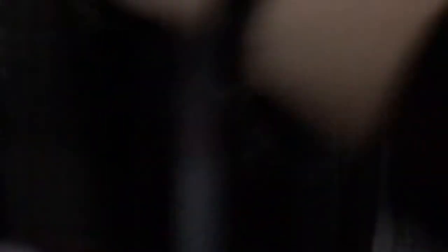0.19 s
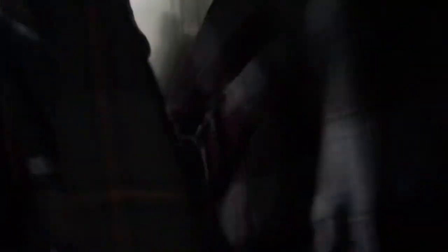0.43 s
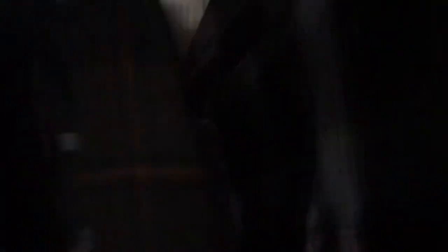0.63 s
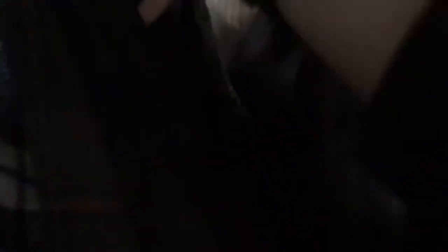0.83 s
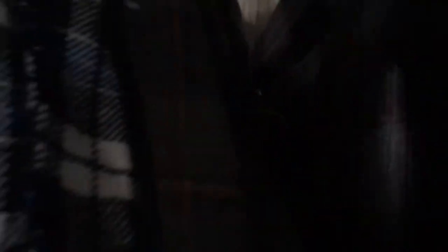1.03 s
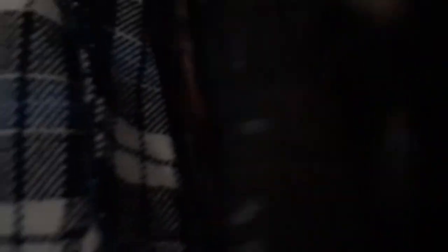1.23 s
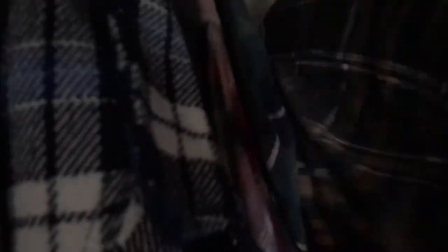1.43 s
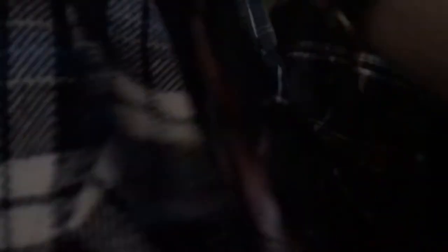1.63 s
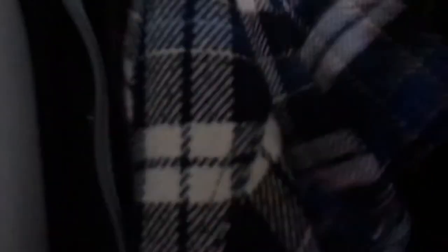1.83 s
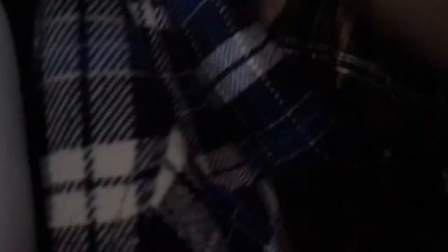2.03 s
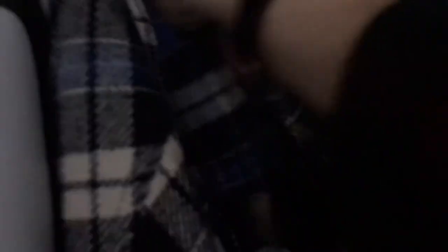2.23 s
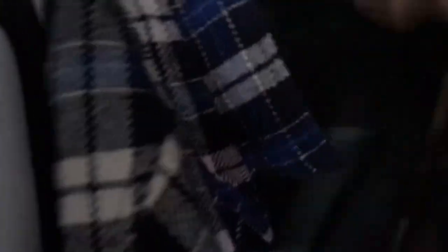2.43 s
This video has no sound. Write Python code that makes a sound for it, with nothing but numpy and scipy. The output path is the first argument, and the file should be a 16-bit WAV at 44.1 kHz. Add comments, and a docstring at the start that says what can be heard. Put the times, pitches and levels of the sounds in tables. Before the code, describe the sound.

Clothes hangers scrape along a closet rail and click together three times, with soft shirt rustle.

```python
"""Hangers pushed along a closet rail, close to a handheld microphone. Their steel hooks scrape on the
rail in three stick-slip strokes, then hooks and plastic bodies clash in bursts of tiny bright clicks.
Hangers knock on wood; shirts rustle and bump softly against the microphone. The cloth-damped closet
gives the hangers a very short tail, and a quiet room hisses and rumbles underneath."""
import sys
import numpy as np
from scipy import signal
from scipy.fft import rfft, irfft, next_fast_len
from scipy.io import wavfile
from scipy.ndimage import map_coordinates

SR = 44100
rng = np.random.default_rng(int(sys.argv[2]) if len(sys.argv) > 2 else 0)


def dump(signal):
    """Clip the signal to [-1, 1] and save it as 16-bit WAV at the path in sys.argv[1]."""
    limited = np.clip(np.atleast_2d(signal).T, -1, 1)
    pcm = np.round(limited * 32767).astype(np.int16)
    wavfile.write(sys.argv[1], SR, pcm)


N = 112455


def hanger_clicks():
    """Hangers clash close up: hook and body ring for milliseconds, then a loose, bright chatter dies."""
    # contacts between hangers: start_s, hook_db, body_db
    contacts = [(0.1863, -44.5, -34), (0.207, -32.5, -56), (0.225, -45, -23.5), (0.229, -2, -24),
                (0.2294, -2, -51), (0.2309, -6.5, -13.5), (0.2328, -4.5, -38), (0.2385, 0, -35),
                (0.2408, -24, -41), (0.2443, -25.5, -49), (0.246, -12, -37), (0.254, -14.5, -28),
                (0.2712, -15, -23.5), (0.2749, -33, -48), (0.29, -21, -25), (0.298, -20, -22.5),
                (0.3002, -52, -26), (0.3115, -25.5, -34), (0.3137, -41, -32.5), (0.3984, -71.5, -49),
                (0.513, -50, -69), (0.6195, -67, -38), (0.6225, -83.5, -45), (0.6547, -55.5, -52),
                (1.2928, -4.5, -28.5), (1.2948, -21, -34), (1.2944, -6.5, -42), (1.2984, -5.5, -20.5),
                (1.301, -19, -48), (1.309, -32, -23), (1.3192, -27, -36), (1.3498, -30, -38),
                (1.3543, -22, -32.5), (1.3565, -35, -40), (1.3668, -32, -37.5), (1.3975, -63, -38),
                (1.4134, -52, -45), (1.5371, -43.5, -61), (1.565, -55.5, -48), (1.6119, -57, -42),
                (1.624, -61, -55), (1.6486, -61.5, -38.5), (1.8103, -68.5, -49.5), (2.2106, -22, -31.5),
                (2.212, -30, -50.5), (2.2151, -40.5, -56), (2.2505, -42, -33), (2.2523, -50, -33),
                (2.2585, -12, -27), (2.2606, -16, -36), (2.2642, -32, -59), (2.267, -27, -63),
                (2.32, -30, -50), (2.32, -30, -39), (2.3253, -15.5, -27.5), (2.3259, -16.5, -43),
                (2.331, -30, -55), (2.363, -35, -69), (2.3692, -15, -40), (2.3701, -16.5, -27),
                (2.3747, -41, -64), (2.3776, -36, -63), (2.4339, -40, -30), (2.436, -52, -35),
                (2.4578, -55, -42), (2.4842, -69, -49), (2.5315, -64, -40)]
    # modes of the steel hook and of the plastic body: pitch_hz, level_db, t60_s
    hook_modes = [(5800, -8, 0.0016), (8800, -10, 0.0045), (9480, -6.5, 0.0041), (11270, -4.5, 0.0035),
                  (13190, -7.5, .004), (14230, -6, 0.0086), (15950, -5.5, 0.0041)]
    body_modes = [(1900, -2, 0.003), (2500, -8, 0.0073), (3366, -4.5, 0.0074), (3886, -5.5, 0.0082),
                  (4350, 0, 0.0021), (5656, 1, 0.0034), (6890, -2.5, 0.006)]
    # as different hangers meet, different body modes ring most: start_s, favoured_hz, boost_db
    partners = [(0, 2500, 12), (.228, 7000, 8), (.25, 5700, 6), (.295, 2500, 4), (1, 7000, 9),
                (1.34, 2500, 8), (1.39, 3900, 4), (1.6, 1900, 6), (2.2, 7000, 4), (2.24, 3400, 13),
                (2.255, 3900, 14), (2.43, 7000, 3), (2.45, 3400, 5)]
    start_s, hook_db, body_db = np.transpose(contacts)
    hooks = struck(start_s, hook_db - 4, hook_modes, attack_s=.00008, detune=.03, scatter_db=3.5)
    change_s, favoured_hz, boost_db = np.transpose(partners)
    partner = np.searchsorted(change_s, start_s) - 1
    away_oct = np.log2(np.transpose(body_modes)[0] / favoured_hz[partner, None])
    bodies = struck(start_s, body_db - 4.5, body_modes, attack_s=.00016, detune=.025, scatter_db=3,
                    colour_db=boost_db[partner, None] * np.exp(-(away_oct / .12) ** 2))
    chatter_db, chatter_t60_s = -22, .032
    blow_power = np.zeros(N)
    blow_power[np.round(start_s * SR).astype(int)] = amp(2 * hook_db)
    chatter_power = signal.lfilter([1], [1, -amp(-120 / (chatter_t60_s * SR))], blow_power)
    # chatter spectrum: frequency_hz, level_db
    bright = [(1500, -19.5), (5000, -11), (9000, 1), (15800, -4.5), (16200, -30)]
    chatter = coloured(grains(per_s=9100, spread_db=4), bright)
    return hooks + bodies + amp(chatter_db) * np.sqrt(chatter_power) * chatter


def hook_scrapes():
    """Hooks slide on the rail; each stroke has its own hook and place, and so its own resonances."""
    # one table a stroke: time_s, level_db, treble_offset_db
    strokes = [
        [(.165, -69.5, 7.5), (.19, -44, -12), (.204, -62.5, -8), (.208, -45.5, 6.5), (.228, -43, 0.5),
         (.25, -42.5, -3.5), (.262, -61, -6.5), (.3, -63.5, -1.5), (.315, -64, -4)],
        [(1.185, -73.5, -10), (1.2, -63.5, -4.5), (1.22, -55, -5.5), (1.245, -46, -1.5), (1.275, -42.5, -5),
         (1.292, -42, -6)],
        [(2.235, -65.5, 0), (2.255, -49, -2), (2.29, -48.5, -1), (2.34, -56, -2.5), (2.385, -59.5, 4),
         (2.43, -76, 5)],
    ]
    # lower and upper resonances of the rail: pitch_hz, width_hz, level_db
    rail_low = [(750, 320, -8), (1120, 280, 1), (2500, 300, 0), (3000, 680, -1.5), (4080, 640, -3),
                (5170, 510, -3), (6440, 470, -3)]
    rail_high = [(8560, 1300, -6), (13000, 2800, -10)]
    # one row a stroke: low singing resonance and whistle (pitch_hz, width_hz, level_db each), dull_hz
    voices = [((1900, 250, -0.5), (10250, 210, 4.8), 4900), ((1580, 166, 6.4), (10450, 500, 3.7), 15000),
              ((1720, 320, 0.67), (11500, 670, -6), 2900)]
    out = np.zeros(N)
    for stroke, (sing, whistle, dull_hz) in zip(strokes, voices):
        level_db, treble_db = level_curves(stroke)
        low = amp(level_db) * stick_slip(rail_low + [sing], dull_hz)
        high = amp(level_db + treble_db - 2.5) * stick_slip(rail_high + [whistle])
        out += low + high
    return out


def stick_slip(resonances, dull_hz=np.inf):
    """Tiny fast slips ring rail and hook, juddering as the grip comes and goes; rms 1."""
    def response(hz):
        bands = sum((-1) ** k * amp(db) * 1j * hz * width / (pitch ** 2 - hz ** 2 + 1j * hz * width)
                    for k, (pitch, width, db) in enumerate(sorted(resonances)))
        return bands / (1 + 1j * hz / dull_hz) ** 2
    judder_per_s, judder_db = 170, 2.5
    judder = map_coordinates(rng.standard_normal(N), [np.arange(N) * judder_per_s / SR])
    slips = amp(judder_db * judder) * grains(per_s=7000, spread_db=.74)
    return unit(filtered(slips, response))


def wood_knocks():
    """Hangers knock dully on wood; the place of the blow favours some modes, broad blows die sooner."""
    # blows, with the modes struck hardest and how far the others reach: start_s, level_db, centre_hz,
    # reach_octaves
    blows = [(.21,-40.5,595,0.27),(0.247,-34,266,1.2),(0.315,-22.5,560,0.94),(.397,-44,1276,1.2),(0.457,-43,210,0.48),(.618,-42.5,495,2),(.633,-42.5,283,0.85),(0.652,-44.5,497,1.05),(1.195,-48,1160,1.4),(1.295,-40.5,330,0.7),(1.364,-29.5,366,0.8),(1.368,-38,1700,1.4),(1.501,-44.5,226,0.71),(1.521,-42,500,1.37),(1.619,-43,796,1.4),(1.651,-40.5,268,0.39),(1.808,-54,500,2.3),(1.975,-43.5,1210,1.5),(1.995,-51,295,0.29),(1.997,-45.5,850,1.1),(2.01,-46.5,1700,1.2),(2.272,-38.5,567,0.11),(2.287,-41,580,0.14),(2.385,-44.5,444,0.73),(2.405,-41.5,435,0.84),(2.504,-47,313,1.27)]
    # modes of the wood, before each blow's damping: pitch_hz, level_db, t60_s
    wood_modes = [(211, -1, 0.099), (267, -2.5, 0.094), (363, 0.5, 0.063), (459, -6.5, .08),
                  (598.3, -5, 0.1), (720, 2.5, 0.041), (979, -2.5, .03), (1093, -1.5, 0.046),
                  (1500, 5, 0.022), (2100, 0.5, 0.031)]
    start_s, level_db, centre_hz, reach_oct = np.transpose(blows)
    away = np.log2(np.transpose(wood_modes)[0] / centre_hz[:, None]) / reach_oct[:, None]
    return struck(start_s, level_db - 1, wood_modes, attack_s=.0003, detune=.029, scatter_db=2,
                  colour_db=-10 * away ** 2, damping=.77 + .5 * (reach_oct / .95) ** 2)


def microphone_thumps():
    """Cloth bumps the microphone itself: each soft push swings out in a few low cycles."""
    # pushes: start_s, level_db, pitch_hz
    pushes = [(0.243, -35.5, 133), (0.322, -28, 89.5), (0.374, -39, 76.7), (0.67, -38, 127),
              (1.208, -44, 59.5), (1.293, -34, 61), (1.37, -32.5, 84), (1.408, -37.5, 66), (1.533, -34, 92),
              (1.559, -36, 103), (2.255, -40, 71), (2.308, -40, 96.9), (2.331, -37.5, 80)]
    t60_cycles, rise_s = 5.76, .002
    out, t = np.zeros(N + SR), np.arange(SR // 4) / SR
    for start_s, level_db, hz in pushes:
        envelope = amp(level_db + 6.5 - 60 * t * hz / t60_cycles) * (1 - np.exp(-t / rise_s))
        out[round(start_s * SR):][:len(t)] += envelope * np.sin(2 * np.pi * hz * t)
    return out[:N]


def cloth_rumble():
    """Cloth pressing on the microphone makes low, noisy thuds with a hollow rumble."""
    # pressure of the cloth: time_s, level_db
    bumps = [(0, -73.5), (.16, -63), (.25, -39), (.3, -52.5), (.33, -38), (.4, -55), (.58, -59.5),
             (.65, -49.5), (.75, -65.5), (1.17, -69), (1.31, -45.5), (1.44, -55), (1.65, -54.5),
             (1.76, -64), (2.21, -66), (2.28, -41), (2.42, -54.5), (2.55, -63.5)]
    # spectra of the thud and the hollow rumble: frequency_hz, level_db
    thud_spectrum = [(12, -40), (20, -11.5), (81, -3.5), (130, -3.5), (204, -16.5), (300, -10.5),
                     (390, -26), (660, -120)]
    hollow_spectrum = [(88, -30.5), (150, 5.5), (292, -14), (357, -6), (551, -8.5), (1500, -25.5),
                       (1950, -43.5), (3300, -120)]
    level_db, = level_curves(bumps)
    thud = coloured(rng.standard_normal(N), thud_spectrum)
    hollow = coloured(rng.standard_normal(N), hollow_spectrum)
    return amp(level_db) * (thud + amp(-7) * hollow)


def shirt_rustle():
    """Shirts rub near the microphone: their fibres make a coarse rustle and a fine swish."""
    # rubbing: time_s, coarse_db, fine_db
    rubbing = [(0, -84.5, -84), (.3, -57.5, -64), (.33, -55, -62), (.38, -68, -76.5), (.44, -100, -91.5),
               (.5, -71.5, -69), (.56, -80, -76), (.64, -73, -88), (.67, -72, -63), (.71, -77, -76.5),
               (.88, -73.5, -75.5), (.94, -69.5, -69.5), (1.06, -74, -64), (1.12, -70, -67),
               (1.2, -67.5, -67), (1.33, -68.5, -56.5), (1.36, -54.5, -58), (1.43, -61.5, -69),
               (1.47, -79, -91.5), (1.52, -74, -74), (1.54, -65, -62), (1.59, -72, -74),
               (1.62, -54.5, -68.5), (1.66, -64, -62.5), (1.7, -75, -71.5), (1.73, -66, -65),
               (1.75, -72, -84), (1.88, -82, -82.5), (1.91, -82.5, -66.5), (2.0, -64.5, -70),
               (2.04, -77, -77), (2.2, -76, -73.5), (2.4, -67.5, -77.5), (2.46, -69.5, -83),
               (2.55, -75, -82)]
    # spectra of the rustle and the swish: frequency_hz, level_db
    coarse_spectrum = [(500, -34), (900, 4), (2500, 0.5), (5000, -3.5), (9000, -9.5), (16000, -35)]
    fine_spectrum = [(2000, -39.5), (5000, -10.5), (8500, -7.5), (11000, -7), (13000, -3), (15800, -8),
                     (16100, -23)]
    return sum(amp(level_db) * coloured(grains(per_s=11000, spread_db=2.5), spectrum)
               for level_db, spectrum in zip(level_curves(rubbing), (coarse_spectrum, fine_spectrum)))


def closet_reverb(x):
    """The short, dull answer of a closet damped by clothes."""
    t60_s, dull_hz, delay_samples = .0554, 7150, 90
    t = np.arange(SR // 5) / SR
    tail = rng.standard_normal(len(t)) * amp(-60 * t / t60_s)
    wet = signal.fftconvolve(np.pad(x, (delay_samples, 0)), tail / np.linalg.norm(tail))[:N]
    return filtered(wet, lambda hz: 1 / (1 + 1j * hz / dull_hz))


def room_tone():
    """The quiet room behind: steady rumble and hiss, with one faint, narrow, high band."""
    # rumble and hiss: frequency_hz, level_db
    spectrum = [(12, -42), (20, 6), (74, 2.5), (247, -14), (301, -18), (497, -19), (1440, -24),
                (1610, -27.5), (4040, -28), (15900, -35)]
    band_hz, width_hz = 12800, 250
    band = filtered(rng.standard_normal(N), lambda hz: np.exp(-((hz - band_hz) / width_hz) ** 2))
    return amp(-60) * coloured(rng.standard_normal(N), spectrum) + amp(-85) * unit(band)


def struck(starts_s, peaks_db, modes, attack_s, detune, scatter_db, colour_db=0, damping=1):
    """Every blow rings the modes anew, each a little off in pitch and level."""
    hz, db, t60_s = np.transpose(modes)
    out = np.zeros(N + SR)
    t = np.arange(int(2 * SR * min(t60_s.max(), .1)))[:, None] / SR
    level_draw, pitch_draw, phase_draw = rng.standard_normal((len(starts_s), 3, len(hz))).swapaxes(0, 1)
    levels_db = db + colour_db + scatter_db * level_draw
    pitches_hz = hz * (1 + detune * pitch_draw)
    damping = damping * np.ones(len(starts_s))
    attack = (1 - np.exp(-t / attack_s)) ** 2
    for i, start_s in enumerate(starts_s):
        envelopes = attack * amp(levels_db[i] - 60 * damping[i] * t / t60_s)
        ring = (envelopes * np.sin(2 * np.pi * pitches_hz[i] * t + np.pi * phase_draw[i])).sum(1)
        out[round(start_s * SR):][:len(t)] += amp(peaks_db[i]) * ring / abs(ring).max()
    return out[:N]


def grains(per_s, spread_db):
    """Tiny random impulses of scattered size."""
    hit = rng.random(N) < per_s / SR
    return hit * rng.standard_normal(N) * amp(spread_db * np.minimum(rng.exponential(size=N), 3))


def level_curves(rows):
    """One level in dB per sample for each column after the time; silent outside."""
    time_s, *columns = np.transpose(rows)
    return [np.interp(np.arange(N) / SR, time_s, db, left=-200, right=-200) for db in columns]


def coloured(x, spectrum):
    """x shaped by (frequency_hz, level_db) points on a log axis; rms 1."""
    points_hz, db = np.transpose(spectrum)
    gain = lambda hz: amp(np.interp(np.log(hz + 1), np.log(points_hz + 1), db, left=-120))
    return unit(filtered(x, gain))


def filtered(x, response):
    """x through a complex frequency response."""
    size = next_fast_len(N + SR // 2)
    return irfft(rfft(x, size) * response(np.fft.rfftfreq(size, 1 / SR)), size)[..., :N]


def amp(db):
    """dB to gain."""
    return 10 ** (np.asarray(db) / 20)


def unit(x):
    """Scaled to rms 1."""
    return x / np.sqrt(np.mean(x ** 2) + 1e-20)


def scene():
    """Mono, at the rail: hangers in the closet, cloth right at the microphone, the room behind."""
    hangers = hanger_clicks() + wood_knocks() + hook_scrapes()
    closet = amp(-7.5) * closet_reverb(hangers)
    cloth = microphone_thumps() + cloth_rumble() + shirt_rustle()
    return (hangers + closet + cloth + room_tone())[None]


def record(dry):
    """The lowest bass is lost, and the highest treble fades out above about 16 kHz."""
    bottom_hz, top_hz, fade_hz = 34, 17100, 1400
    low_cut = lambda hz: (1j * hz / (bottom_hz + 1j * hz)) ** 2
    high_cut = lambda hz: np.sin(np.pi / 2 * np.clip((top_hz - hz) / fade_hz, 0, 1)) ** 3
    return filtered(dry, lambda hz: low_cut(hz) * high_cut(hz))


dry = scene()
out = record(dry)
dump(out)
```